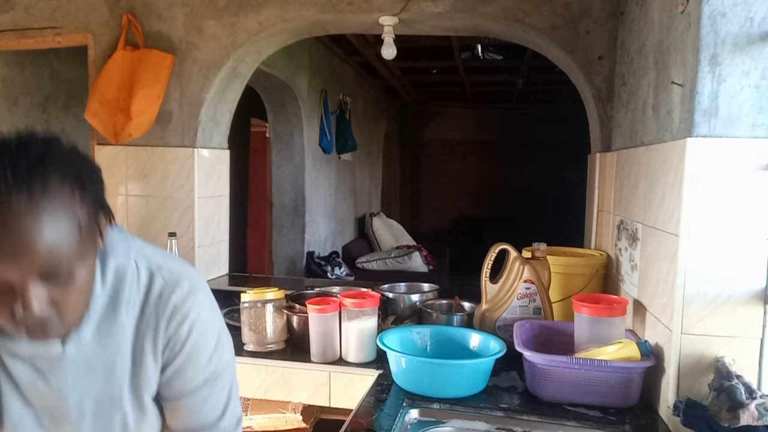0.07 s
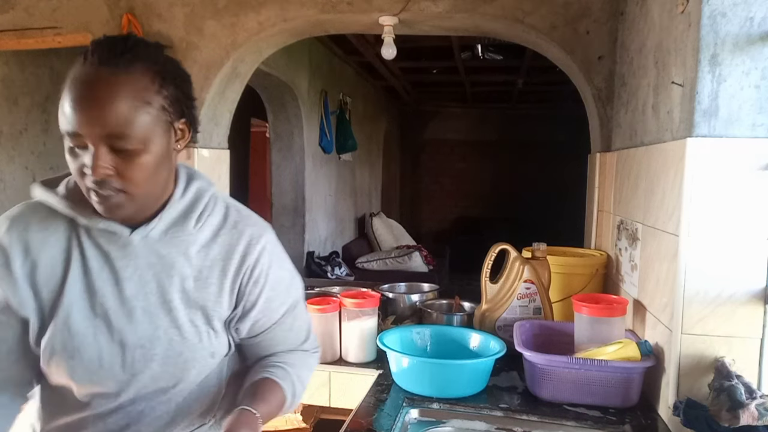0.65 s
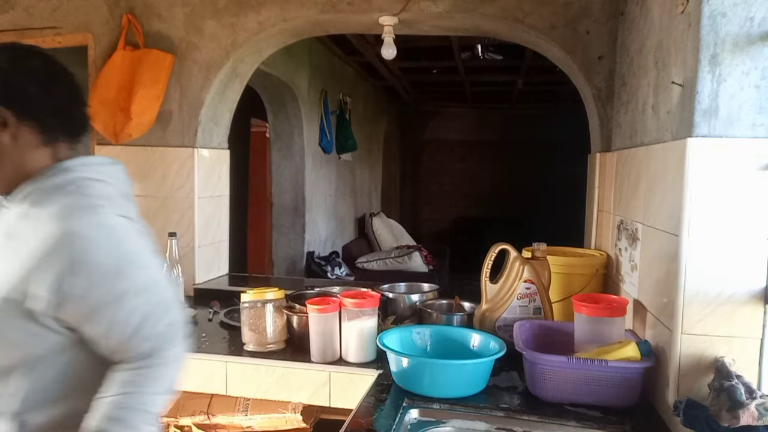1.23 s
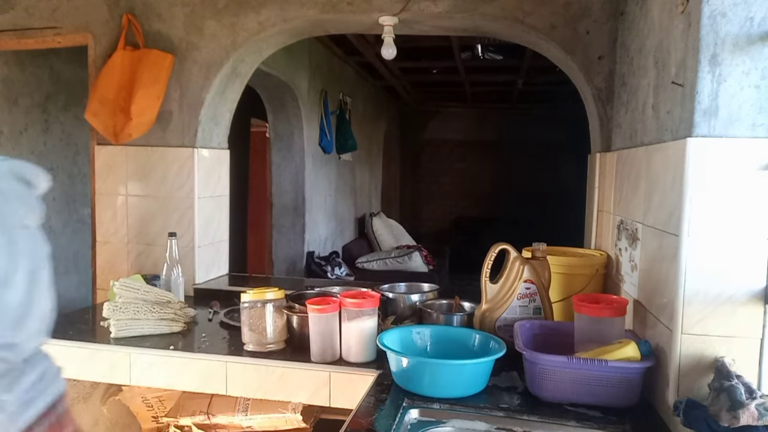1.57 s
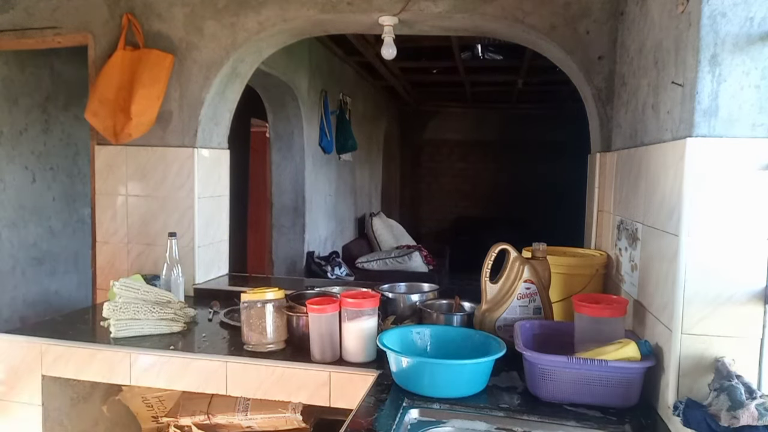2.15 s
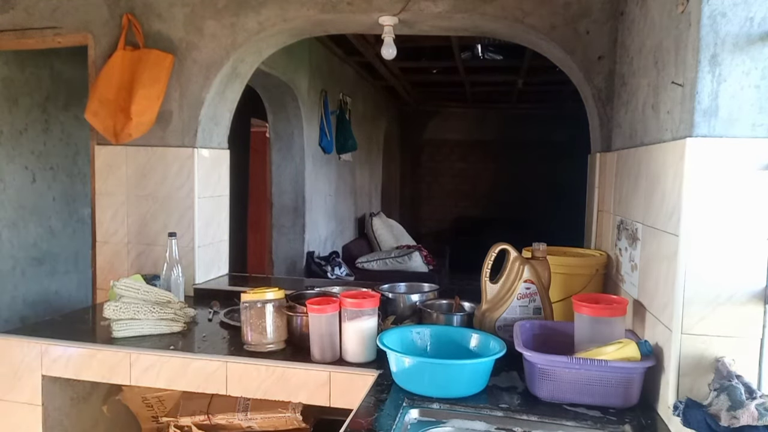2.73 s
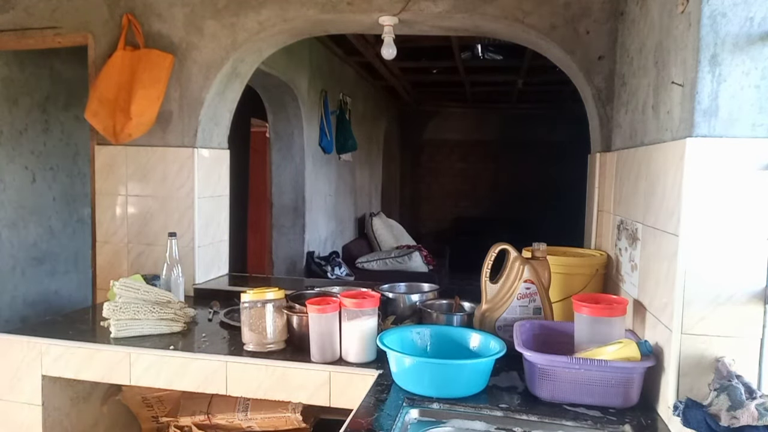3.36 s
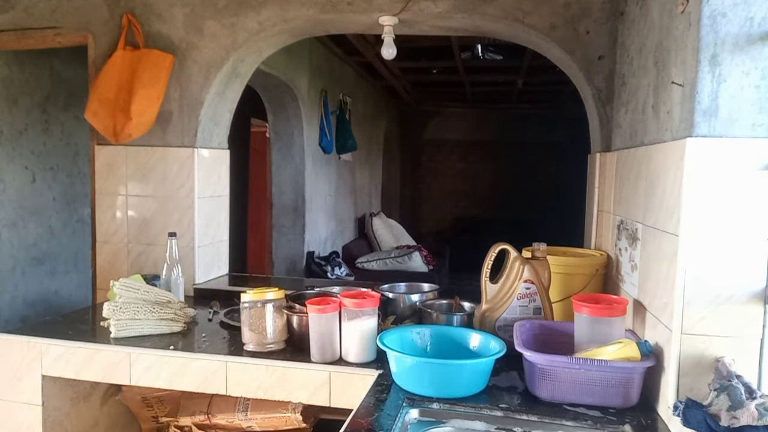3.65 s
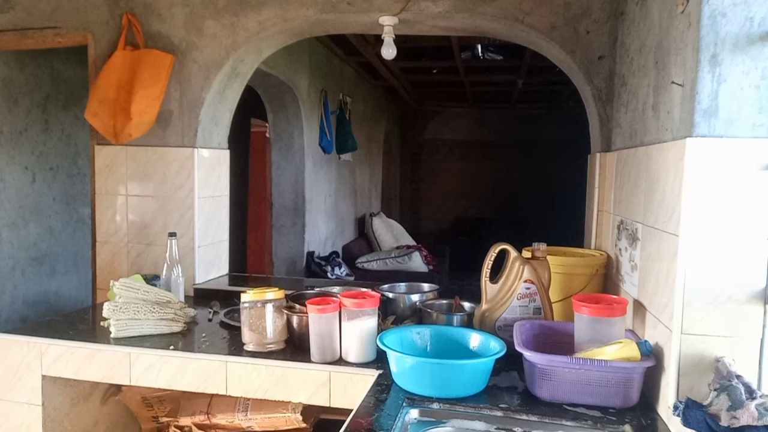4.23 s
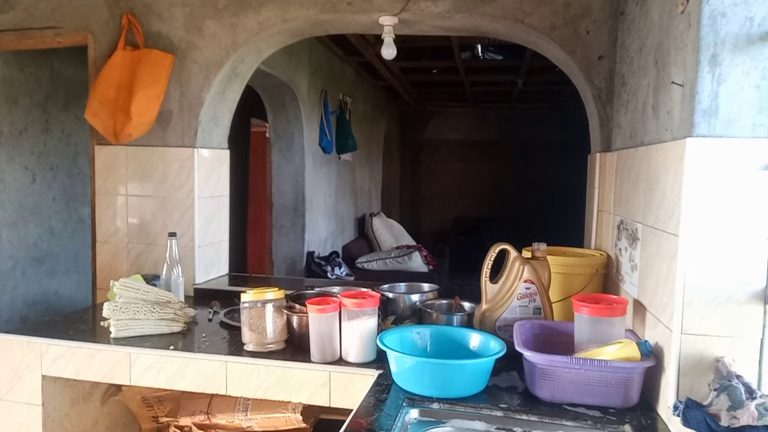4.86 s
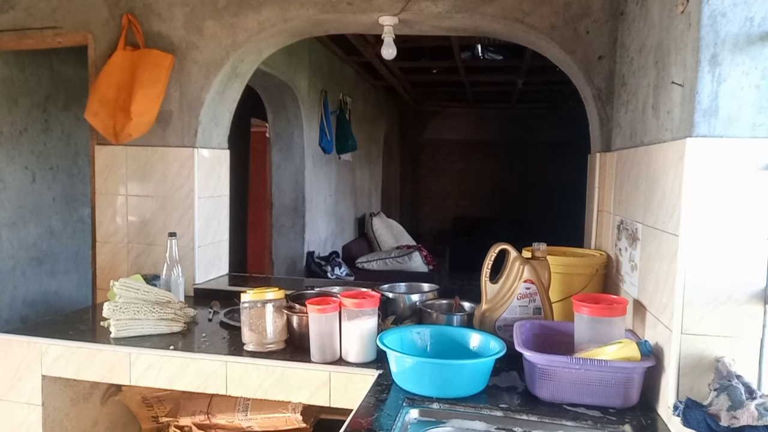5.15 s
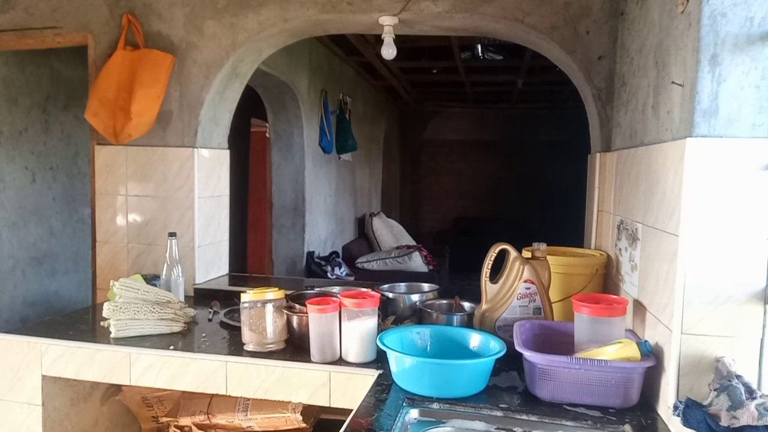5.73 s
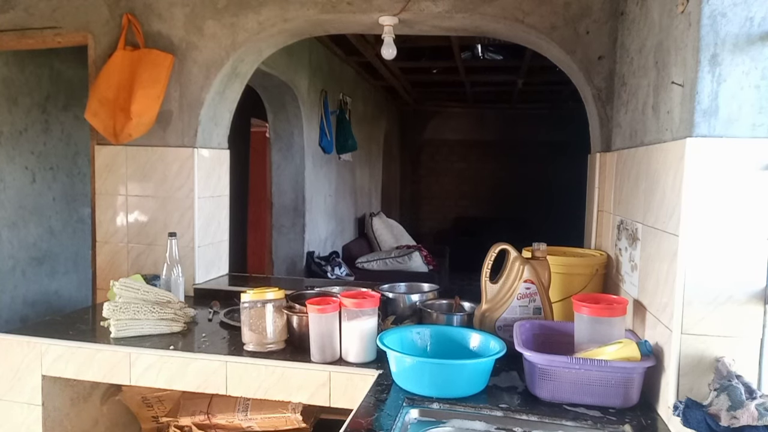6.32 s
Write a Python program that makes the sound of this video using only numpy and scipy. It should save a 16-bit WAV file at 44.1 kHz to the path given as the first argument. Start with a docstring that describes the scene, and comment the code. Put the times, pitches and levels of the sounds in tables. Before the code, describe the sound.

In a tiled kitchen with a short echo, heard from a few steps away, a brief rasping slide gives way to a light container knock and quiet shuffling. A hollow plastic tub lands in a loud run of knocks, then groans and squeaks as it is shoved along. Water follows, poured from a can in repeated surges that drum on the plastic, splash and bubble, with low gulps of air.

```python
"""A plastic tub clatters down, is dragged juddering into place, then takes water from a can.
Blows ring its wall modes; its foot sticks and slips, so the walls groan and the rim chatters.
Air gulps into the can; the water drums, splashes, bubbles and sprays in surges.
Earlier, things slide over tiles, a small container is set down, feet and clothes scuff.
All a few steps away in a tiled kitchen whose hard walls echo."""
import sys
import numpy as np
from scipy import signal
from scipy.fft import rfft, irfft, next_fast_len
from scipy.io import wavfile
from scipy.ndimage import uniform_filter1d, map_coordinates

SR = 44100
rng = np.random.default_rng(int(sys.argv[2]) if len(sys.argv) > 2 else 0)


def persist_wave(psi):
    """Save psi, clipped to +-1, as 16-bit WAV."""
    counts = np.round(np.clip(psi, -1, 1) * 32767).astype(np.int16)
    wavfile.write(sys.argv[1], SR, np.atleast_2d(counts).T)


N = 290514

# Table levels are relative; each source adds its own gain.
# blows on the tub: (time [s], level [dB], body offset [dB], crack offset [dB], body pitch [Hz],
# ring level [dB], settling delay [s])
TUB_KNOCKS = [(3.552, -3, -7, -20.5, 440, -17, .017), (3.626, -5.5, -14, -20, 394, -37, .013),
              (3.673, -4, -10, -20, 666, -27, .031), (3.733, -6.5, -26, -25.5, 540, -46, 0.026),
              (3.759, -10, -4.5, -21, 720, -32, 0.01), (3.869, -11.5, -11, -25, 930, -30.5, .014),
              (3.924, -19.5, -11, -26, 820, -50, 0.023), (4.19, -19, -2, -36, 440, -41, .005),
              (4.239, -20.5, -16, -19, 503, -39, 0.011), (4.488, -25.5, -1, -24.5, 308, -40.5, .031),
              (5.388, -24, -1, -13, 386, -35, .008)]
# small hollow container set down:
# (time [s], level [dB], body offset [dB], crack offset [dB], body pitch [Hz], ring level [dB])
JAR_KNOCKS = [(1.557, -26.5, -7.5, -23, 585, -36.5)]
# light things handled: (time [s], level [dB], body offset [dB], crack offset [dB], body pitch [Hz])
TAPS = [(0.011, -13.5, -10, -16.5, 352), (0.094, -16.5, -33, -11.5, 350), (0.319, -21, -23, -24, 748),
        (0.574, -48, -20, -12, 428), (1.319, -52, -20, -2, 700), (2.348, -36, -13, -20, 980),
        (2.579, -44.5, 0.5, -7, 316), (3.353, -46, 0, -18, 445), (5.098, -26, 4.5, -15.5, 750),
        (5.113, -21, 0.5, -22, 830), (5.254, -30.5, -20, -30, 810)]
# wall modes: (frequency [Hz], level [dB], t60 [s])
TUB_MODES = [(145, -27, 0.48), (223.3, -4.5, 0.29), (249, -9, 0.75), (376, 2.5, 0.49), (404, -10.5, 0.62),
             (444.3, -0.5, 0.43), (541, -1, 0.31), (615, -14.5, 0.75), (687, -26, .5), (812, -6.5, 0.46),
             (1020, -5.5, 0.31), (1146, -4, 0.26)]
JAR_MODES = [(545, -5, 0.4), (604, 3, 0.22), (760, -2, 0.11), (1343, -14, .25), (1980, -10, 0.3)]
# footfalls and soft tub bumps: (time [s], level [dB], pitch [Hz])
BUMPS = [(1.892, -44.5, 65), (2.657, -47, 90), (2.968, -37.5, 60.7), (3.017, -39, 61.6), (3.19, -45, 62),
         (3.477, -19, 187), (3.498, -21.5, 215), (3.525, -23.5, 190), (3.566, -26, 125),
         (3.816, -24.5, 117), (4.39, -29, 80), (4.509, -34, 231), (4.572, -36, 80)]
# shoves on the tub: (time [s], rise [s], hold [s], groan [dB], chatter [dB], rasp [dB])
SHOVES = [(4.145, 0.03, 0.035, -20.5, -28.5, -45.5), (4.221, 0.012, 0.017, -27, -38.5, -46),
          (4.279, 0.031, 0.097, -35.5, -43, -47), (4.473, 0.024, 0.065, -42, -55, -44.5)]
# rubbed plastic catching: (time [s], length [s], pitch [Hz], level [dB])
SQUEAKS = [(0.0, 0.1, 352.3, -25), (0.152, 0.067, 1265, -32.5), (4.166, 0.031, 448, -22),
           (4.185, 0.011, 390, -16.5), (4.175, 0.028, 2580, -28.5), (4.177, 0.024, 2230, -32),
           (4.244, 0.024, 503, -18), (4.251, 0.065, 257, -29.5), (4.503, 0.03, 303, -32)]
# surges from the can: (time [s], rise [s], hold [s], splash [dB], gulp lead [s], gulp [dB])
SURGES = [(5.381, 0.044, 0.018, -25.5, 0.056, -40.5), (5.571, 0.057, 0.07, -26, 0.069, -39),
          (5.72, 0.07, 0.11, -23, 0, -38), (5.947, 0.071, 0.069, -22, -.01, -49),
          (6.135, 0.056, .12, -24, 0.007, -47.5), (6.349, 0.055, 0.12, -24.5, -.04, -43)]
# first trickle, then steady stream: (time [s], rise [s], hold [s], drumming [dB], splash [dB])
FLOWS = [(5.152, 0.032, 0.2, -43, -53.5), (5.378, 0.011, 1.3, -34, -36.5)]
# rasping push that ends the slide: (time [s], rise [s], hold [s], level [dB])
LAST_PUSH = [(0.27, 0.036, .015, -35)]
# feet and clothes: (time [s], rise [s], hold [s], level [dB], grit offset [dB])
SCUFFS = [(0.438, .05, 0.058, -48, -7.5), (0.561, 0.034, 0.031, -37, -7), (0.742, 0.089, 0.09, -54, -5.5),
          (1.169, .05, 0.048, -51.5, -7), (1.65, .04, 0.13, -56, -6), (1.759, 0.15, .02, -42.5, -6.5),
          (1.925, 0.035, 0.024, -45, 0), (2.078, 0.052, 0.04, -54.5, -17), (2.333, 0.036, 0.093, -47.5, 0),
          (2.46, 0.081, 0.013, -46, -5), (2.578, .012, .012, -52, -17), (2.872, .005, 0.022, -53, -14),
          (2.92, 0.064, 0.019, -35, -7.5), (3.348, 0.038, 0.027, -56.5, -1),
          (3.398, 0.16, .03, -40.5, -7.5), (4.64, 0.014, .02, -62.5, 3), (4.822, .005, 0.031, -59, 2),
          (5.024, .006, 0.023, -81, 12), (5.26, .02, 0.012, -54, -23), (5.33, .01, .04, -67, 5)]

# spectra: (frequency [Hz], level [dB])
KNOCK_CLACK = [(350, -16), (600, -7.5), (645, -2.5), (1020, -10), (1280, -9.5), (1380, -10.5), (2380, -10),
               (3780, -14), (5410, -33.5), (7000, -39), (9100, -62.5), (15400, -120)]
KNOCK_CRACK = [(3500, 0), (5200, 1.5), (6500, -5), (8800, 5), (11000, -4), (15500, -12)]
DRAG_GROAN = [(53, -34.5), (90, -4.5), (160, -21), (193, -4.5), (250, -10.5), (286, -13), (497, -4.5),
              (684, -17.5), (774, -14), (833, -22), (1200, -24.5), (1300, -22), (1700, -37), (2210, -51),
              (3740, -120)]
DRAG_RASP = [(470, -27), (800, -3.5), (1290, -7), (1610, -8), (2600, -7), (4340, -14), (5240, -19),
             (6330, -25.5), (9450, -20), (15000, -36), (16000, -36.5)]
WATER_DRUM = [(76, -31), (130, -6.5), (172, -82), (204, -11), (323, -5), (365, 0), (408, -0.5), (591, -4.5),
              (692, 2), (1110, -3), (1200, -3), (1480, -17), (1900, -10), (2470, -24), (4180, -120)]
WATER_SPLASH = [(820, -29), (1400, -6), (1740, -12), (2070, -7), (2660, -3), (3550, -3), (4070, -6),
                (4930, -17.5), (6500, -24.5), (8450, -47), (14300, -120)]
WATER_SPRAY = [(3240, -19), (5500, -9), (6940, -7.5), (9240, 0), (10100, -6), (12200, -11.5),
               (14900, -13.5), (15600, -17), (16000, -17)]
AIR_GULP = [(30, -14), (55, 2), (80, -4), (125, 3), (180, -8), (320, -40)]
SLIDE_RUMBLE = [(71, -57), (120, -53), (157, -36), (204, -11.5), (289, -20.5), (347, -8), (533, -13.5),
                (799, -12.5), (1050, -20.5), (1130, -15.5), (1900, -21.5), (2470, -38), (4180, -120)]
SLIDE_RASP = [(940, -63), (1600, -4.5), (3110, 4), (4000, -0.5), (4890, -11), (5820, -15), (7690, -14),
              (9330, -8), (12500, -21.5), (14800, -20.5), (16000, -33)]
SOLE_BRUSH = [(100, -27), (350, -8.5), (800, -10), (1500, -12), (2500, 0), (3700, 0), (5000, -10.5),
              (7000, -21), (12000, -41)]
FLOOR_GRIT = [(3000, -43.5), (4800, -12), (6500, -8.5), (9000, 0), (11500, -8.5), (15500, -15)]
ROOM_TONE = [(15, -37), (25, -3), (76, 11), (161, -0.5), (384, 2), (591, -1.5), (775, 1), (1440, -6.5),
             (2990, -1.5), (3920, -6.5), (5880, -21), (9320, -12), (12200, -24), (14800, -18), (16000, -34)]
# kitchen reverberation: (frequency [Hz], t60 [s])
ROOM_DECAY = [(100, 0.8), (400, 0.4), (1000, 0.43), (3000, 0.36), (9000, 0.3), (15000, 0.21)]

BODY_T60_S, RASP_T60_S, HISS_T60_S = 0.61, 0.42, 0.31  # decay after a motion stops
SETTLE_DB, SETTLE_BODY_DB, SETTLE_CRACK_DB = -10, 7, -5.5  # re the first blow


def knocks(clack_db, body_db, crack_db, body_rel_width, build_s):
    """Each contact: a sharp crack, a mid clack and the hollow note of the thing struck."""
    out, t = np.zeros(N), np.arange(SR) / SR
    build = (1 - 0.5 * np.exp(-t / build_s)) * (1 - np.exp(-t / 0.0005))  # first echoes pile up
    # the tub lands on one edge, then settles flat with a duller blow
    settlings = [(s + delay_s, db + SETTLE_DB, hollow + SETTLE_BODY_DB, sharp + SETTLE_CRACK_DB, hz)
                 for s, db, hollow, sharp, hz, _, delay_s in TUB_KNOCKS]
    for s, db, hollow_db, sharp_db, hz, *_ in TUB_KNOCKS + settlings + TAPS + JAR_KNOCKS:
        clack = echoes(lambda f: amp(along(KNOCK_CLACK, f)), early_t60_s=0.16, late_db=-7)
        body = echoes(lambda f: abs(resonance(f, hz, body_rel_width * hz)) ** 2,
                      early_t60_s=0.29, late_db=-17.5)
        crack = echoes(lambda f: amp(along(KNOCK_CRACK, f)), early_t60_s=0.16, late_db=-2)
        thud = amp(clack_db) * clack + amp(body_db + hollow_db) * body
        add(out, s, amp(db) * (amp(crack_db + sharp_db) * crack + build * thud))
    return out


def ringing(blows, modes, waver):
    """Each blow rings the wall modes at new strengths; echoes blur their phase."""
    out, t = np.zeros(N), np.arange(SR) / SR
    attack = 1 - np.exp(-t / 0.0024)
    for s, db in blows:
        for hz, mode_db, t60_s in modes:
            tone = wavering_tone(hz, waver)
            decay = amp(db + mode_db + 2 * rng.standard_normal() - 60 * t / t60_s)
            add(out, s, attack * decay * tone)
    return out


def bumps(level_db, rel_width):
    """Soft tub bumps and footfalls boom briefly in the room."""
    out, t = np.zeros(N), np.arange(SR) / SR
    attack = 1 - np.exp(-t / 0.004)
    for s, db, hz in BUMPS:
        boom = echoes(lambda f: abs(resonance(f, hz, rel_width * hz)) ** 2, early_t60_s=0.17, late_db=-5)
        add(out, s, amp(db + level_db) * attack * boom)
    return out


def drag(slip_hz, jitter, groan_db, chatter_db, rim_hz, rim_width_hz, rasp_db, t60_s):
    """The tub's foot sticks and slips unevenly: walls groan, rim chatters, contact rasps."""
    groan = strokes([(s, rise, hold, db) for s, rise, hold, db, _, _ in SHOVES], t60_s)
    chatter = strokes([(s, rise, hold, db) for s, rise, hold, _, db, _ in SHOVES], t60_s)
    rasp = strokes([(s, rise, hold, db) for s, rise, hold, _, _, db in SHOVES], HISS_T60_S)
    drift = unit(uniform_filter1d(rng.standard_normal(N), SR // 100))
    rate_hz = slip_hz * np.exp(jitter * drift)
    slips = np.diff(np.floor(np.cumsum(rate_hz) / SR), prepend=0)
    slips *= amp(3.4 * rng.standard_normal(N))
    judder = in_room(unit(slips - slips.mean()), direct=0.7)
    rim = unit(filtered(judder, lambda f: resonance(f, rim_hz, rim_width_hz) ** 2))
    return (amp(groan_db) * groan * coloured(judder, DRAG_GROAN)
            + amp(chatter_db) * chatter * rim
            + amp(rasp_db) * rasp * grains(DRAG_RASP, rate_hz=6000, spread_db=1.5))


def squeaks(waver, t60_s):
    """Friction locks briefly onto one note, which then dies away."""
    out, t = np.zeros(N), np.arange(SR) / SR
    attack = 1 - np.exp(-t / 0.0025)
    for s, length_s, hz, db in SQUEAKS:
        decay = amp(db - 60 * np.maximum(t - length_s, 0) / t60_s)
        add(out, s, attack * decay * wavering_tone(hz, waver))
    return out


def water(drum_db, splash_db, spray_db, bubble_db, sputter_db, sputter_hz):
    """The jet drums on the tub, splashes, traps bubbles and throws fine spray."""
    surges = [(s, rise, hold, db) for s, rise, hold, db, _, _ in SURGES]
    stream_drum = strokes([(s, rise, hold, db) for s, rise, hold, db, _ in FLOWS], BODY_T60_S)
    stream_splash = strokes([(s, rise, hold, db) for s, rise, hold, _, db in FLOWS], RASP_T60_S)
    drum_gain = np.hypot(stream_drum, amp(drum_db) * strokes(surges, BODY_T60_S))
    splash_gain = np.hypot(stream_splash, strokes(surges, RASP_T60_S))
    spray_gain = amp(spray_db) * np.hypot(stream_splash, strokes(surges, HISS_T60_S))
    drum = through_tub(grains(WATER_DRUM, rate_hz=4000, spread_db=1.4), share=0.26, width_hz=13)
    froth = amp(splash_db) * grains(WATER_SPLASH, rate_hz=14000, spread_db=3)
    froth += amp(bubble_db) * bubbles(centre_hz=2625, spread=0.243, cycles=9, rise=0.044, count=6000)
    spray = grains(WATER_SPRAY, rate_hz=12000, spread_db=1.12)
    sputter = amp(sputter_db * wobble(sputter_hz))  # the jet breaks up unevenly
    return sputter * (drum_gain * drum + splash_gain * froth + spray_gain * spray)


def bubbles(centre_hz, spread, cycles, rise, count):
    """Small bubbles ring for a few cycles, rising in pitch."""
    when, pitch, size = rng.random(count), rng.standard_normal(count), rng.random(count)
    hz = np.clip(centre_hz * np.exp(spread * pitch), 400, 6000)[:, None]
    samples = np.arange(500)
    age = hz * samples / SR / cycles
    rings = size[:, None] * np.exp(-2 * age) * np.sin(2 * np.pi * cycles * age * (1 + rise * age))
    places = (when * N).astype(int)[:, None] + samples
    fizz = np.bincount(places.ravel(), rings.ravel(), N)[:N]
    return in_room(unit(fizz), direct=0.97)


def gulps(rise_s, hold_s):
    """Air enters the can: one low gulp per surge."""
    gain = strokes([(s - lead_s, rise_s, hold_s, db) for s, *_, lead_s, db in SURGES], BODY_T60_S)
    return gain * coloured(rng.standard_normal(N), AIR_GULP)


def slide(start_s, rise_s, hold_s, sag_db_per_s, rumble_db, rasp_db):
    """Hollow things rumble and rasp over the tiles, fading as they slow."""
    slowing = amp(-sag_db_per_s * np.minimum(np.arange(N) / SR, hold_s))
    speed = slowing * stroke(start_s, rise_s, hold_s, BODY_T60_S)
    rumble = through_tub(grains(SLIDE_RUMBLE, rate_hz=1500, spread_db=1.9), share=0.27, width_hz=17)
    rasp = grains(SLIDE_RASP, rate_hz=5000, spread_db=0.67)
    rasp_gain = np.hypot(amp(rasp_db) * speed, strokes(LAST_PUSH, HISS_T60_S))
    return amp(rumble_db) * speed * rumble + rasp_gain * rasp


def scuffs(grit_db):
    """Soles and cloth brush along; fine grit crackles under them."""
    brush_gain = strokes([(s, rise, hold, db) for s, rise, hold, db, _ in SCUFFS], RASP_T60_S)
    grit_gain = strokes([(s, rise, hold, db + grit) for s, rise, hold, db, grit in SCUFFS], HISS_T60_S)
    return (brush_gain * grains(SOLE_BRUSH, rate_hz=7000, spread_db=2.4)
            + amp(grit_db) * grit_gain * grains(FLOOR_GRIT, rate_hz=4500, spread_db=1.3))


def room_tone(level_db):
    """Faint steady background noise."""
    return amp(level_db) * coloured(rng.standard_normal(N), ROOM_TONE)


def echoes(colour, early_t60_s, late_db):
    """Room response to a blow: dense echoes off near tiles, then the long tail."""
    t = np.arange(SR) / SR
    near, far = [unit(filtered(rng.standard_normal(SR), colour)) for _ in range(2)]
    near /= np.sqrt(np.mean(near[:SR // 25] ** 2))
    hz, age_s, bands = signal.stft(far, SR, nperseg=256)
    bands = bands * amp(-60 * age_s / along(ROOM_DECAY, hz)[:, None])
    tail = signal.istft(bands, SR, nperseg=256)[1][:SR]
    return near * amp(-60 * t / early_t60_s) + amp(late_db) * tail * (1 - np.exp(-t / 0.022))


def in_room(x, direct):
    """A running sound plus echoes that change as the source moves."""
    out, hop = np.zeros(N), SR // 5
    padded = np.pad(x, (hop, 2 * hop))
    window = np.sin(np.linspace(0, np.pi, 2 * hop))
    for start in range(0, N + hop, hop):
        response = echoes(np.ones_like, early_t60_s=0.13, late_db=-8)[:SR // 3]
        piece = padded[start:start + 2 * hop] * window
        wet = signal.fftconvolve(piece, response / np.linalg.norm(response))
        add(out, (start - hop) / SR, wet[max(hop - start, 0):])
    return unit(direct * x + out)


def grains(spectrum, rate_hz, spread_db):
    """Tiny random impacts of uneven size, echoed and shaped to a spectrum."""
    sizes = rng.standard_normal(N) * amp(spread_db * np.minimum(rng.exponential(size=N), 4))
    impacts = unit(sizes * (rng.random(N) < rate_hz / SR))
    return coloured(in_room(impacts, direct=1.48), spectrum)


def through_tub(x, share, width_hz):
    """Part of the sound takes on the tub's wall modes."""
    walls = filtered(x, lambda f: sum(amp(db) * resonance(f, hz, width_hz) for hz, db, _ in TUB_MODES))
    return unit(x + share * unit(walls))


def stroke(start_s, rise_s, hold_s, t60_s):
    """Gain of one motion: swell, hold, decay."""
    t = np.arange(N) / SR - start_s
    swell = np.sin(np.pi / 2 * np.clip(t / rise_s, 0, 1)) ** 1.97
    stopped_s = np.clip(t - rise_s - hold_s, 0, 1)
    drop_db = np.minimum(stopped_s / 0.021, 1)  # direct sound ends, echoes remain
    return swell * amp(-drop_db - 60 * stopped_s / t60_s)


def strokes(rows, t60_s):
    """Joint gain of motions: (time [s], rise [s], hold [s], level [dB])."""
    return np.sqrt(sum((amp(db) * stroke(s, rise, hold, t60_s)) ** 2 for s, rise, hold, db in rows))


def wavering_tone(hz, waver):
    """1 s sine with random-walk phase."""
    turns = hz * np.arange(SR) / SR + rng.random()
    drift = waver * np.cumsum(rng.standard_normal(SR)) / np.sqrt(SR)
    return np.sin(2 * np.pi * (turns + drift))


def wobble(rate_hz):
    """Smooth random curve of about unit size."""
    knots = rng.standard_normal(int(N * rate_hz / SR) + 4)
    return map_coordinates(knots, [np.arange(N) * rate_hz / SR])


def resonance(f, hz, width_hz):
    """Response of one damped mode."""
    return 1j * f * width_hz / (hz * hz - f * f + 1j * f * width_hz)


def coloured(x, spectrum):
    """x shaped by a spectrum, at rms 1."""
    return unit(filtered(x, lambda hz: amp(along(spectrum, hz))))


def filtered(x, response):
    """x through a frequency response."""
    size = next_fast_len(len(x) + 8192)
    return irfft(rfft(x, size) * response(np.fft.rfftfreq(size, 1 / SR)), size)[:len(x)]


def along(points, hz):
    """(frequency [Hz], value) points read on a log axis."""
    f, values = np.transpose(points)
    return np.interp(np.log(hz + 1), np.log(f + 1), values)


def add(track, time_s, sound):
    """Mix a sound into the track."""
    start = max(round(time_s * SR), 0)
    track[start:start + len(sound)] += sound[:N - start]


def amp(db):
    """Decibels to gain."""
    return 10 ** (np.asarray(db) / 20)


def unit(x):
    """Scale to rms 1."""
    return x / np.sqrt(np.mean(x ** 2) + 1e-20)


def scene():
    """Mono mix of all sources."""
    mix = knocks(clack_db=-6.5, body_db=-3.5, crack_db=-3, body_rel_width=0.75, build_s=0.024)
    mix += bumps(level_db=-2, rel_width=0.44)
    mix += ringing([(s, ring_db) for s, *_, ring_db, delay_s in TUB_KNOCKS], TUB_MODES, waver=0.43)
    mix += ringing([(s, ring_db) for s, *_, ring_db in JAR_KNOCKS], JAR_MODES, waver=0.76)
    mix += slide(start_s=-0.024, rise_s=0.017, hold_s=0.335, sag_db_per_s=24.5,
                 rumble_db=-26, rasp_db=-27)
    mix += scuffs(grit_db=0.5)
    mix += squeaks(waver=0.78, t60_s=0.077)
    mix += drag(slip_hz=256.1, jitter=0.14, groan_db=-0.5, chatter_db=-5,
                rim_hz=2230, rim_width_hz=770, rasp_db=4, t60_s=0.41)
    mix += water(drum_db=-9.5, splash_db=-1.9, spray_db=-10, bubble_db=-5,
                 sputter_db=0.7, sputter_hz=69.9)
    mix += gulps(rise_s=0.0097, hold_s=0.038)
    mix += room_tone(level_db=-58.5)
    return mix[None]


def record(dry):
    """Band limit: 45 Hz high-pass, hard cut at 15760 Hz."""
    lean = signal.sosfilt(signal.butter(3, 45, "highpass", fs=SR, output="sos"), dry)
    return np.array([filtered(channel, lambda hz: hz < 15760) for channel in lean])


dry = scene()
out = record(dry)
persist_wave(out)
```